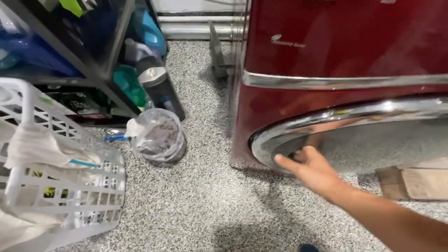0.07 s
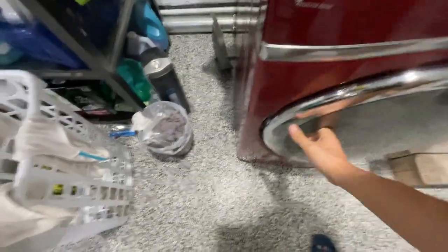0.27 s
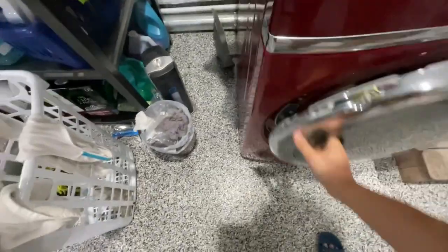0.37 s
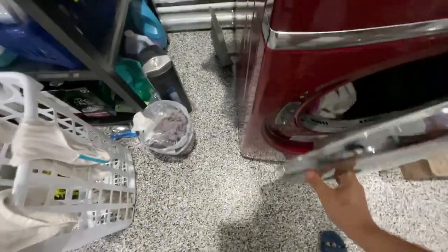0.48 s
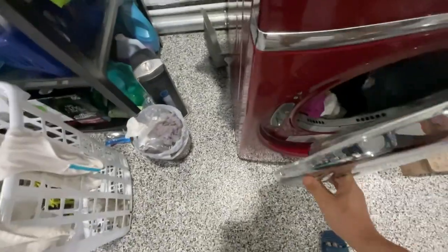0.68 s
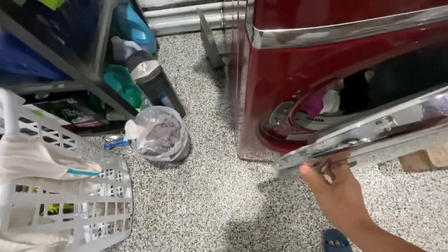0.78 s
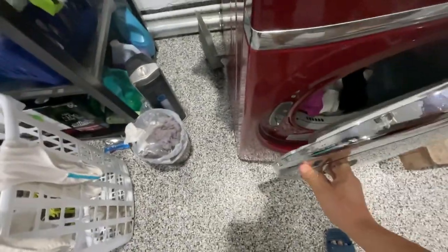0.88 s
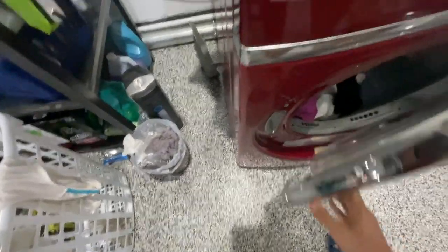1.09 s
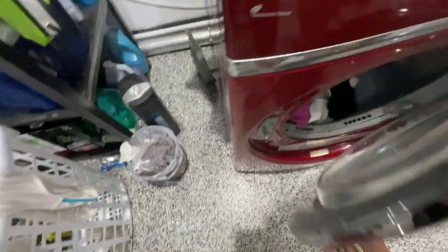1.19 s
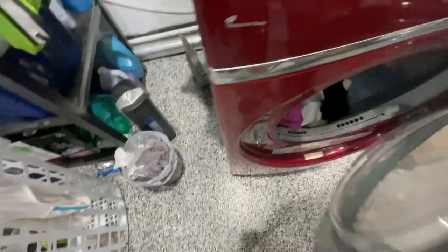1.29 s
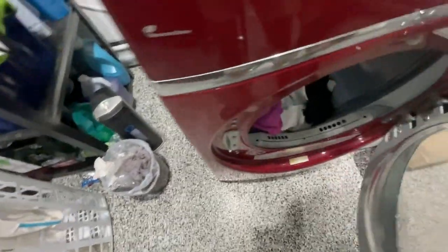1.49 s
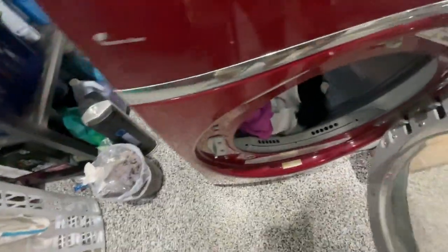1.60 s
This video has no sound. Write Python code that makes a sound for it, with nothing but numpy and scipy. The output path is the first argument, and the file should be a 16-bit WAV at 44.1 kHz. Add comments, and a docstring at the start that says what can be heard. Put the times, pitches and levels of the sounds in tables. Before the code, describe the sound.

A front-loading washer door is pulled open with a sharp latch snap and heavy double clunk.

```python
"""In a garage, the door of a front-loading washing machine is pulled open, heard from arm's length.
Short noise bursts and fading tones make the handle's ticks, the latch's snap and the door's two clunks.
Sagging low tones make the heavy door thud and the cabinet boom; small knocks and ticks follow as it swings.
Gritty noise makes a scuff, probably a sandal on the floor, and a soft bump ends it.
Echoes off near surfaces and the room surround everything but the scuff."""
import sys
import numpy as np
from scipy import signal
from scipy.fft import rfft, irfft
from scipy.io import wavfile

SR = 44100
rng = np.random.default_rng(int(sys.argv[2]) if len(sys.argv) > 2 else 0)


def generate_wav(sig):
    """Save sig (samples, or channels by samples) to the path in sys.argv[1] as 16-bit PCM at SR."""
    pcm = np.round(np.clip(np.atleast_2d(sig).T, -1, 1) * 32767).astype(np.int16)
    wavfile.write(sys.argv[1], SR, pcm)


N = 72765  # length in samples

# In all tables, decay_s is the time to fall to about 37 %, fade_s the time to fall by 60 dB.
# Steady background, and faint handling noise at the first grip: pitch_hz, level_db
AIR_COLOUR = [(22, -79.5), (35, -54.5), (52, -29.5), (80, -43.5), (160, -48), (400, -56), (1000, -70),
              (3000, -69), (5000, -93), (16000, -88.5)]
GRIP_COLOUR = [(25, -58), (52, -20.5), (85, -39.5), (140, -33), (300, -51), (550, -53), (750, -47),
               (1300, -57.5), (3000, -64.5), (8000, -77.5), (16000, -86.5)]
# Gritty scuff over time: time_s, level_db; and its colour: pitch_hz, level_db
SCUFF_LEVEL = [(1.131, -68.5), (1.209, -58), (1.265, -57.5), (1.275, -49), (1.325, -49.5), (1.345, -51),
               (1.42, -53.5), (1.469, -51.5), (1.518, -56.5), (1.65, -56)]
GRIT_COLOUR = [(100, 0), (240, 8.5), (450, 4), (900, 4.5), (2500, 0.5), (5000, -2), (6200, 3), (7400, -5),
               (10000, -3), (13000, -5), (16000, -19.5)]
# Soft low bumps and rubs of the swinging door: start_s, rise_s, decay_s, level_db
RUBS = [(.17, 0.029, 0.054, -30), (.565, 0.088, 0.14, -39.5), (.742, 0.0031, 0.014, -31),
        (.935, .012, 0.027, -35), (.975, 0.004, 0.008, -32), (.994, 0.0027, 0.0062, -35),
        (1.562, 0.03, 0.018, -23)]
# Colour of the rubs: pitch_hz, level_db
RUB_COLOUR = [(22, -36.5), (50, -11), (130, 7), (270, 0.5), (400, -9.5), (600, -19), (1500, -33),
              (6000, -68.5)]
# Dull knocks as the door swings: start_s, rise_s, decay_s, level_db
KNOCKS = [(.681, 0.009, 0.026, -31.5)]
# Colour of the knocks: pitch_hz, level_db
KNOCK_COLOUR = [(100, -14), (350, -12), (554, 9.5), (660, -9), (791, 3.5), (1050, -5), (1800, -2.5),
                (2100, -5.5), (2500, -1.5), (3700, -23), (5000, -35), (11000, -42), (16000, -57)]
# Tones of the hinge click: pitch_hz, level_db, fade_s
HINGE_TONES = [(2576, 7, 0.013), (3470, -7, 0.015), (10900, -2.5, 0.0047), (12800, -12, 0.011)]
# Pitches at which the ticks' levels are given: pitch_hz
TICK_HZ = [700, 1800, 4500, 11000]
# Ticks of plastic handle and hinge: start_s, decay_s, then one level_db for each TICK_HZ
TICKS = [(0.135, 0.0059, -37.5, -41.5, -47, -62), (0.183, 0.0073, -29, -30.5, -47, -66),
         (0.1977, 0.0046, -24, -22, -40, -32), (0.2809, 0.0013, -12, -30, -40, -28),
         (0.3397, 0.0097, -62.5, -24.5, -34, -29.5), (0.384, 0.016, -16.5, -29.5, -51, -38),
         (0.4599, 0.0045, -37, -42, -43, -44), (0.678, 0.0085, -54, -33.5, -55, -63.5),
         (1.0628, .002, -51.5, -48.5, -55, -68.5), (1.1697, 0.0014, -56.5, -48, -54, -58.5),
         (1.2, 0.0019, -54, -51.5, -49.5, -56), (1.276, 0.0032, -41, -51, -43, -40),
         (1.318, 0.002, -71, -34, -57, -40), (1.444, 0.00081, -36, -29, -42, -52),
         (1.463, 0.0042, -45.5, -41.5, -46.5, -52), (1.544, 0.00089, -45, -48, -54, -59),
         (1.577, 0.0018, -49, -40, -52, -59)]
# Tones of the latch: pitch_hz, level_db, fade_s
LATCH_TONES = [(642, -32, 0.056), (767, -31, .08), (1307, -21, 0.063), (1544, -21.5, 0.04),
               (3770, -33.5, 0.056), (4370, -34, .056), (6540, -30, 0.024), (10450, -31, 0.029),
               (14900, -28, .008)]
# Colour of the snap itself and of the rattle after it: pitch_hz, level_db
SNAP_COLOUR = [(100, 0), (500, -17.5), (2000, -2.5), (3150, -8.5), (3650, 15.5), (4650, 8.5), (5100, -5),
               (5900, 13), (6550, 6.5), (7300, -4.5), (10400, -10.5), (16000, -17.5)]
LATCH_RATTLE_COLOUR = [(200, -43.5), (450, -36.5), (700, -29), (1400, -22), (2100, -19.5), (3000, -29.5),
                       (4000, -27.5), (5100, -39.5), (6000, -32), (7500, -39.5), (10500, -38), (16000, -44)]
# Thuds of the door's mass: start_s, pitch_hz (at first), sag_octaves_per_s, rise_s, decay_s,
# level_db, drum_level_db
THUDS = [(0.2938, 166, 14, 0.009, 0.023, -14, -41.5), (0.2889, 269, 1.3, .005, .018, -20, -52.5),
         (.326, 220, 3, 0.0058, .01, -24, -61), (0.3602, 137.2, 1.1, 0.011, 0.014, -10, -42.5),
         (.381, 203, 1.5, 0.0055, 0.02, -26.5, -59.5), (1.584, 135.3, 17.6, 0.034, 0.016, -26, -86)]
# Tones of the hollow drum and cabinet: pitch_hz, level_db, fade_s
DRUM_TONES = [(54, 5, 0.6), (72.7, -4, 1.66), (105.54, 4.5, .8), (125.4, 2, 1.2), (154.7, 1, 1.21),
              (204, -5, 0.45), (219.5, 3, 0.63), (255.4, 0, 0.38)]
# Broad rumble of the seal and glass bowl in every thud: pitch_hz, level_db (relative to the thud)
RUMBLE_COLOUR = [(22, -35.5), (60, -8.5), (120, -1), (200, 1), (310, 3.5), (380, -6), (600, -22),
                 (2000, -50)]
# The door's hollow plastic frame: pitch_hz, fade_s, first_clunk_level_db, second_clunk_level_db
FRAME_TONES = [(505, .11, -27, -40.5), (545, 0.12, -34, -34.5), (778, .08, -30.5, -47),
               (870, 0.056, -46, -27.5), (1030, .09, -40, -27.5), (1162, 0.034, -21, -50),
               (1333, .05, -18, -38), (1471, 0.05, -25, -24.5)]
# Times at which the frame is struck: start_s
FRAME_HITS = (.2852, .3452)
# Contacts in the door's clunks: start_s, rise_s, decay_s, body_level_db, crack_level_db, # panel_level_db: the
# last column is the panel ring
CLUNKS = [(0.2858, .0003, 0.011, -10.5, -23, -49.5), (0.2918, .001, 0.021, -19, -28.5, -47),
          (0.3458, 0.00042, 0.03, -16, -36, -46), (0.3502, 0.00011, 0.0064, -13.5, -20, -43)]
# Colour of the clunks' dull body and bright crack: pitch_hz, level_db
BODY_COLOUR = [(22, -47), (60, -29), (250, 6), (380, -4), (500, -2.5), (700, -0.5), (1100, -0.5),
               (1450, -4), (1650, -13.5), (2700, -15.5), (4000, -29.5), (12000, -50)]
CRACK_COLOUR = [(300, -14.5), (1500, -7), (2700, 10), (3400, 2), (4300, 4.5), (7500, -9), (10200, -7.5),
                (16000, -11)]
# Tones of the sheet-metal cabinet and door panel: pitch_hz, level_db, fade_s
PANEL_TONES = [(316.6, 2, 0.47), (454.3, -5, 0.27), (499, -6, 0.29), (534, -10, 0.31), (779, -1.5, .42),
               (843, -4.5, 0.69), (1043, 1, 0.32), (1118, -14.5, 0.281), (1458, 5.5, 0.091),
               (1452, -1, 0.23), (2045, -14, 0.52), (2600, -14.5, 0.22)]
# Reverberation time of the garage: pitch_hz, fade_s (a negative time grows instead of fading)
ROOM_FADE = [(100, 1.35), (500, 0.6248), (1500, 0.55), (4000, 0.38), (9000, 0.5), (16000, -0.16)]
# Colour of the room's echo and of the near surfaces' echoes: pitch_hz, level_db
ROOM_COLOUR = [(60, -26), (200, -14), (500, -5.5), (2000, -13), (5000, -12.5), (16000, -4)]
EARLY_COLOUR = [(100, -15), (300, -17), (700, -5), (2000, -1.5), (3000, -8), (5000, -3), (12000, 0.5)]
# Left side compared with right: pitch_hz, left_minus_right_db
BALANCE = [(50, -2.5), (140, -5), (260, -6.5), (500, 6), (1000, 4.5), (2000, 6), (4000, -4.5), (12000, 3)]
# Width of the stereo pair: pitch_hz, side_gain_db
WIDTH = [(200, -9), (500, 0), (1000, -2), (2000, -1), (4000, -1), (8000, -3.5), (14000, -12.5)]


def amp(db):
    """Turn decibels into a plain multiplier."""
    return 10 ** (np.asarray(db) / 20)


def at_hz(points, hz):
    """Read (pitch_hz, value) points on a log-frequency axis."""
    point_hz, values = np.array(points, float).T
    return np.interp(np.log(np.maximum(hz, 1)), np.log(point_hz), values)


def colour(x, points):
    """Filter a sound to the given (pitch_hz, level_db) curve, with no sound before its cause."""
    size = 2 ** 17
    log_gain = np.log(amp(at_hz(points, np.fft.rfftfreq(size, 1 / SR))))
    # folding the cepstrum forward in time gives the minimum-phase filter
    cepstrum = irfft(log_gain)
    cepstrum[1:size // 2] *= 2
    cepstrum[size // 2 + 1:] = 0
    response = np.exp(rfft(cepstrum))
    return irfft(rfft(x, size) * response)[..., :N]


def since(start_s):
    """Seconds passed since the start, zero before it."""
    return np.maximum(np.arange(N) / SR - start_s, 0)


def swell(start_s, rise_s, decay_s):
    """Level curve with a smooth attack and an exponential decay."""
    t = since(start_s)
    attack = np.sin(np.pi / 2 * np.minimum(t / rise_s, 1))
    return attack * np.exp(-t / decay_s)


def burst(start_s, rise_s, decay_s):
    """Noise for the dense chatter of a contact dying away."""
    return rng.standard_normal(N) * swell(start_s, rise_s, decay_s)


def ring(start_s, tones, push_s=0.00044):
    """Fading tones of a struck object, set going by a short push."""
    t = since(start_s)
    total = 0
    for hz, db, fade_s in tones:
        total = total + amp(db - 60 * t / fade_s) * np.sin(2 * np.pi * hz * t)
    return np.minimum(t / push_s, 1) * total


def soft_contacts(rows, points):
    """Drawn-out contacts, as noise bursts that share one colour."""
    contacts = sum(amp(db) * burst(start_s, rise_s, decay_s) for start_s, rise_s, decay_s, db in rows)
    return colour(contacts, points)


def background():
    """Low room rumble, with a little more noise while the hand takes its grip."""
    grip_end_s, grip_fade_s = 0.25, 0.042
    gripping = np.clip((grip_end_s - since(0)) / grip_fade_s, 0, 1)
    air = colour(rng.standard_normal(N), AIR_COLOUR)
    return air + colour(rng.standard_normal(N) * gripping, GRIP_COLOUR)


def scuff():
    """Grit slides under a sole, brighter when louder; scattered paths give each side its own noise."""
    rough_db, treble_swell = 3, 1  # treble_swell: extra treble dB for each dB of level
    level_db = np.interp(since(0), *np.array(SCUFF_LEVEL).T)
    # the roughness jumps to a new random level every 32 samples
    rough_steps = np.repeat(rng.standard_normal(N // 32 + 1), 32)[:N]
    grains = amp(rough_db * rough_steps)
    slide = colour(rng.standard_normal((2, N)) * grains, GRIT_COLOUR)
    low = signal.sosfilt(signal.butter(1, 2500, fs=SR, output="sos"), slide)
    treble = (slide - low) * amp(treble_swell * (level_db - level_db.max()))
    return amp(level_db) * (low + treble)


def rubs():
    """The swinging door bumps and rubs softly, as low-coloured noise."""
    return soft_contacts(RUBS, RUB_COLOUR)


def knocks():
    """The swinging door knocks dully and wakes its panel."""
    ring_db = -31.5  # panel ring, relative to the knock
    panel = sum(amp(db + ring_db) * ring(start_s, PANEL_TONES, rise_s)
                for start_s, rise_s, decay_s, db in KNOCKS)
    return soft_contacts(KNOCKS, KNOCK_COLOUR) + panel


def hinge():
    """The hinge clicks once as the door swings, as a few short metallic tones."""
    start_s, level_db = 0.8335, -51.5
    return amp(level_db) * ring(start_s, HINGE_TONES, push_s=0.0003)


def ticks():
    """Small plastic contacts: a hard edge, then brief chatter, each with its own colour."""
    edge_db = 15  # relative to the chatter
    bass_db = -15  # at 150 Hz, relative to the lowest TICK_HZ
    out = 0
    for start_s, decay_s, *levels_db in TICKS:
        contact = burst(start_s, 0.0003, decay_s)
        contact[round(start_s * SR)] += amp(edge_db)
        bass = (150, levels_db[0] + bass_db)
        top = (16000, levels_db[-1] - 10.5)
        out = out + colour(contact, [bass, *zip(TICK_HZ, levels_db), top])
    return out


def latch():
    """The sprung catch snaps in two bright bands, then rings and rattles in its housing."""
    start_s, ring_db, push_s = 0.2481, -4, 0.0012
    blow = np.zeros(N)
    blow[round(start_s * SR)] = 1
    snap = colour(blow, SNAP_COLOUR)
    ringing = amp(ring_db) * ring(start_s, LATCH_TONES, push_s)
    rattle = colour(burst(start_s, 0.00021, 0.029), LATCH_RATTLE_COLOUR)
    return snap + ringing + rattle


def thuds():
    """The heavy door shudders for a few rough, sagging cycles and leaves the drum humming."""
    shudder = hum = rumble = 0
    for start_s, hz, sag, rise_s, decay_s, db, drum_db in THUDS:
        t = since(start_s)
        sagging_hz = (t > 0) * hz * 2 ** (-sag * t)
        phase = 2 * np.pi * np.cumsum(sagging_hz) / SR
        shudder = shudder + amp(db) * swell(start_s, rise_s, decay_s) * np.sin(phase)
        hum = hum + amp(drum_db) * ring(start_s, DRUM_TONES, push_s=0.0085)
        rumble = rumble + amp(db) * burst(start_s, rise_s, decay_s)
    return shudder + hum + colour(rumble, RUMBLE_COLOUR)


def frame():
    """The hollow frame is struck at two different spots, each favouring other tones."""
    out = 0
    for k, start_s in enumerate(FRAME_HITS):
        tones = [(hz, levels_db[k], fade_s) for hz, fade_s, *levels_db in FRAME_TONES]
        out = out + ring(start_s, tones, push_s=0.002)
    return out


def clunks():
    """The hook clears the catch, then the door leaves its seal: chattering body, bright crack, ringing panels."""
    body = crack = panels = 0
    for start_s, rise_s, decay_s, body_db, crack_db, panel_db in CLUNKS:
        body = body + amp(body_db) * burst(start_s, rise_s, decay_s)
        crack = crack + amp(crack_db) * burst(start_s, rise_s, decay_s)
        panels = panels + amp(panel_db) * ring(start_s, PANEL_TONES)
    return colour(body, BODY_COLOUR) + colour(crack, CRACK_COLOUR) + panels


def reflections(x, count=56, size=2048):
    """Echoes off near surfaces; their pattern keeps changing as door and microphones move."""
    fade = swell(0.00052, 0.00038, 0.007)[:size]
    fade = fade / np.linalg.norm(fade)
    place = np.linspace(0, count - 1, N)
    out = 0
    for k, pattern in enumerate(rng.standard_normal((count, 2, size))):
        # each pattern fades into the next
        share = np.sqrt(np.maximum(1 - abs(place - k), 0))
        out = out + signal.oaconvolve((x * share)[None], pattern * fade, axes=1)[:, :N]
    return colour(out, EARLY_COLOUR)


def room_tail():
    """The room's echo as noise in nine bands, each with its own fading time, different on each side."""
    hz = np.fft.rfftfreq(N, 1 / SR)
    noise = rfft(rng.standard_normal((2, N)))
    centres_hz = np.geomspace(60, 16000, 9)
    tail = 0
    for centre_hz, pick in zip(centres_hz, np.eye(len(centres_hz))):
        band = irfft(noise * at_hz(list(zip(centres_hz, pick)), hz), N)
        fade = swell(0.0057, 0.022, at_hz(ROOM_FADE, centre_hz) / np.log(1000))
        tail = tail + band * fade / np.linalg.norm(fade)
    return colour(tail, ROOM_COLOUR)


def late(x, lag_s):
    """Delay a sound by the extra time it takes to arrive."""
    return np.pad(x, (round(lag_s * SR), 0))[:N]


def garage(edge, front):
    """Direct sound reaches the right microphone first; near surfaces and room answer each side differently."""
    # lag of the left microphone: the door's edge, and the broad front of the cabinet
    edge_lag_s, front_lag_s = 0.00022, 0.00009
    both = edge + front
    echoes = signal.fftconvolve(both[None], room_tail(), axes=1)[:, :N] + reflections(both)
    left = late(edge, edge_lag_s) + late(front, front_lag_s) + echoes[0]
    right = both + echoes[1]
    # half of the level difference goes to each side
    left_colour = [(hz, db / 2) for hz, db in BALANCE]
    right_colour = [(hz, -db / 2) for hz, db in BALANCE]
    return np.array([colour(left, left_colour), colour(right, right_colour)])


def scene():
    """Door and background are heard in the garage; the scuff joins them directly."""
    edge = background() + rubs() + knocks() + hinge() + ticks() + latch() + thuds()
    front = frame() + clunks()
    return garage(edge, front) + scuff()


def record(dry):
    """The recorder narrows the stereo width, most at the low and high ends, and cuts the top."""
    mid = (dry[0] + dry[1]) / 2
    side = (dry[0] - dry[1]) / 2
    side_gain = amp(at_hz(WIDTH, np.fft.rfftfreq(2 * N, 1 / SR)))
    side = irfft(rfft(side, 2 * N) * side_gain)[:N]
    top_cut = signal.ellip(10, 0.2, 80, 15950, fs=SR, output="sos")  # cut above 15950 Hz
    return signal.sosfilt(top_cut, [mid + side, mid - side])


dry = scene()
out = record(dry)
generate_wav(out)
```